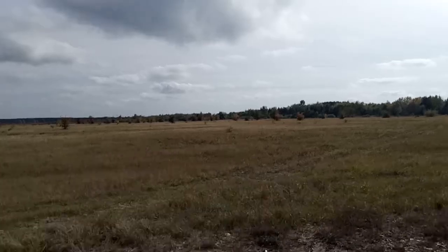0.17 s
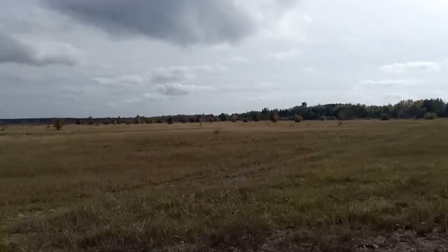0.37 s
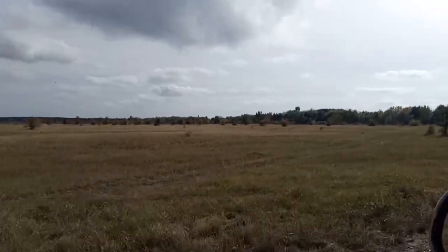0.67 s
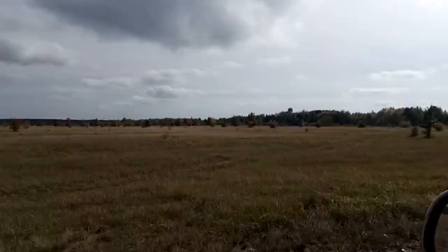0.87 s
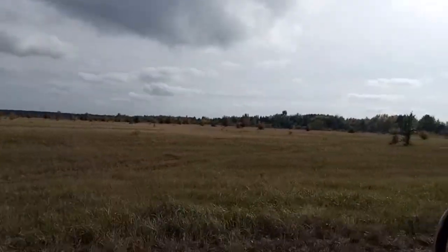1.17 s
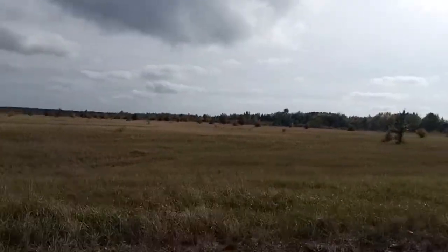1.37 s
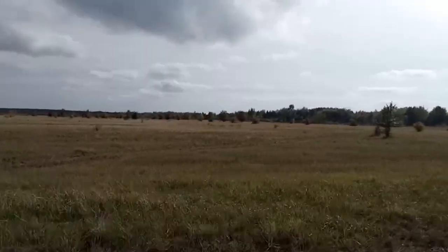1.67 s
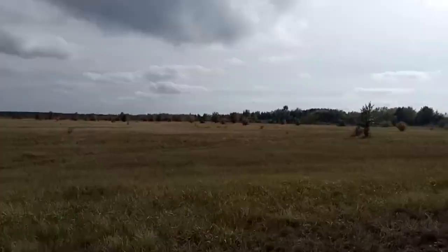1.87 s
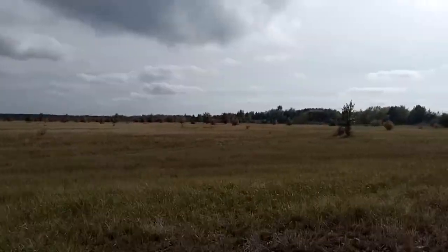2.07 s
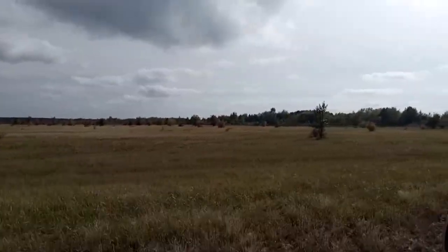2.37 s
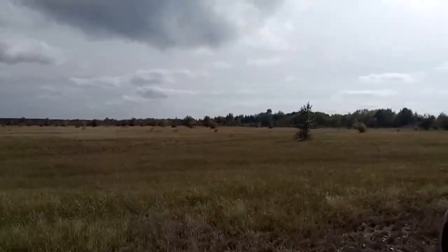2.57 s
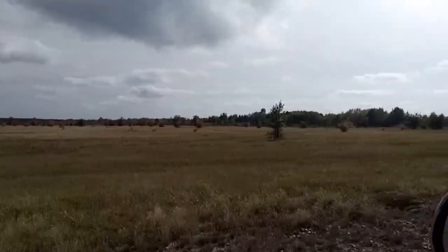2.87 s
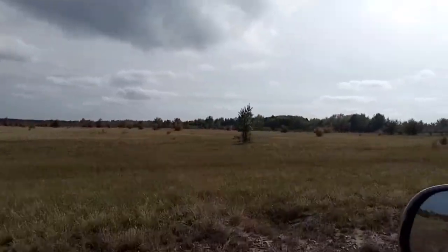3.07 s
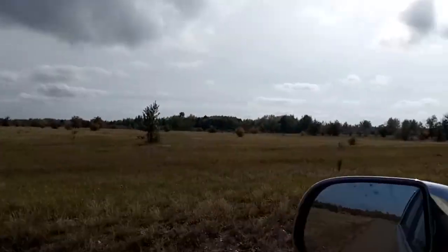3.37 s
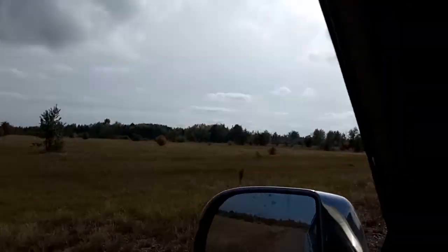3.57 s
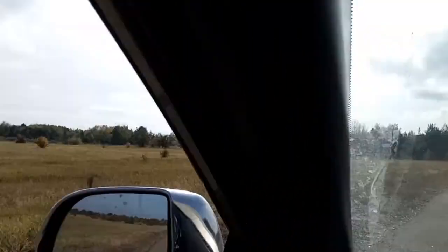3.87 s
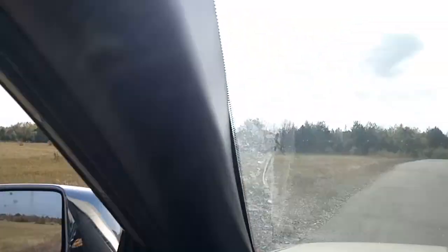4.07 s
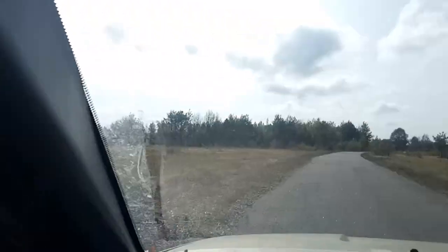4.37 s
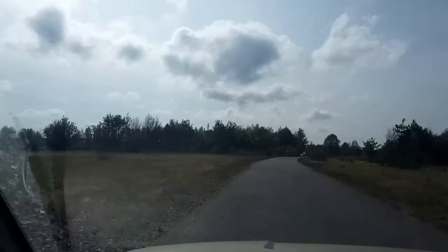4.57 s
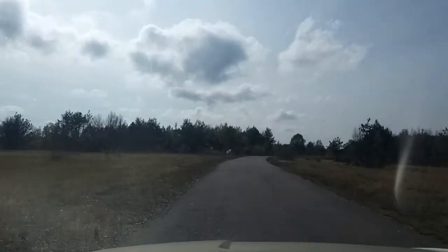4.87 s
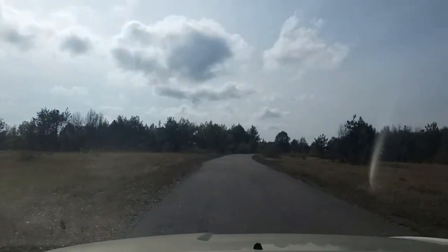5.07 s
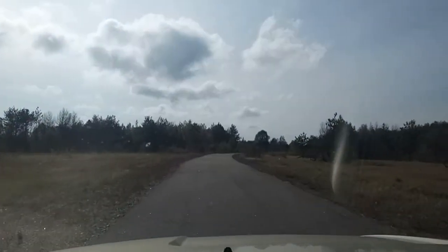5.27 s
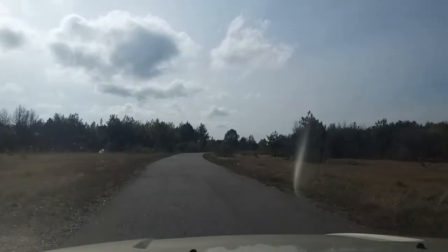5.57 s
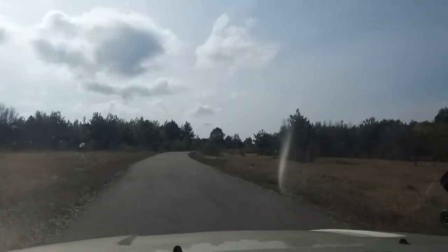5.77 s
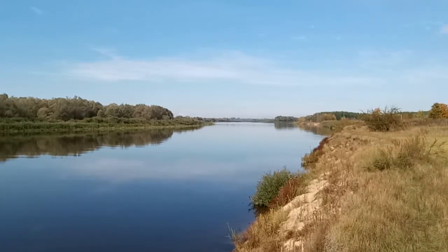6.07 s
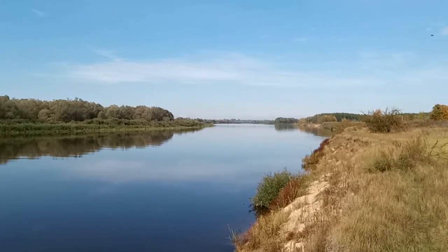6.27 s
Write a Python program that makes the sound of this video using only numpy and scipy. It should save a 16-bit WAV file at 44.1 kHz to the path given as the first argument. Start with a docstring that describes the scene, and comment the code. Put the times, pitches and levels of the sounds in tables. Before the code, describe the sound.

Heard from inside a car on a narrow road beside a field: fluttering low wind at the open window, tyre roar and a wavering engine hum. Hand and sleeve rub the microphone faintly, with a few dry ticks. As it turns toward the windscreen the roar softens and grows boomier. Near the end everything cuts abruptly to a quiet river bank, with only small low puffs of wind.

```python
"""A car rolls along a narrow road, heard from inside by an open window: wind rumble, tyre roar, engine hum.
Wind and tyres are shaped noise, the engine is a few wavering tones; grit and a brake add faint hiss.
As the camera turns from window to windscreen, hand and sleeve rub it (noise bursts) and it ticks (snaps).
Then comes an abrupt change to a quiet river bank: short low tones for puffs of wind on the microphone,
over soft noise for breeze, flutter and open air."""
import sys
import numpy as np
from scipy import signal
from scipy.fft import rfft, irfft
from scipy.io import wavfile
from scipy.ndimage import uniform_filter1d

SR = 44100
rng = np.random.default_rng(int(sys.argv[2]) if len(sys.argv) > 2 else 0)


def output_pcm(signal):
    """Save a mono or channel-first signal as 16-bit PCM at the path in sys.argv[1].

    Samples are clipped to [-1, 1] before scaling.
    """
    pcm = np.clip(np.atleast_2d(signal).T, -1, 1) * 32767
    wavfile.write(sys.argv[1], SR, np.round(pcm).astype(np.int16))


N = 283122
TIME, HZ = np.arange(N) / SR, np.fft.rfftfreq(N, 1 / SR)  # seconds, and the frequencies of the whole sound
DRIVE_START, DRIVE_END = .082, 5.8528  # seconds

# The camera's turn. Each row: time in seconds, share of the way from window (0) to windscreen (1).
CAMERA_TURN = [(0, 0), (3.2, 0.16), (3.75, 0.65), (4.6, 0.77), (5.8, 0.93)]
# Fade-in of the drive. Each row: time in seconds, level in dB.
DRIVE_FADE = [(.082, -25), (.128, -23.5), (.15, -11.5), (.18, -7), (.225, -6), (.28, -1), (.35, 0)]

# Tone of the wind buffeting, facing the window and then the windscreen.
# Each row: frequency in Hz, relative level in dB per Hz.
RUMBLE_WINDOW = [(8, -10), (32, -18), (45, 1.5), (54, -2), (64, -1.5), (80, -2), (105, 0.5), (132, 1.5),
                 (155, -4.5), (200, -5), (255, -6.5), (310, -15.5), (450, -21), (900, -73)]
RUMBLE_SCREEN = [(8, -12), (32, -9), (45, -8), (64, 4.5), (78, -2), (105, 0), (130, 3.5), (155, -7.5),
                 (225, -8), (275, -14.5), (450, -25), (900, -70)]
# Brief rises and dips in level, shared by the wind rumble and the engine hum.
# Each row: middle in seconds, change in dB, half length in seconds.
RISES_AND_DIPS = [(.2, -0.5, 0.026), (0.49, -3.5, .025), (.668, 2, .04), (0.854, -3, .014),
                  (1.268, 1.5, 0.0088), (1.857, -5.5, .035), (2.293, 5, 0.0096), (2.612, 4, 0.029),
                  (2.755, -5, .012), (3.044, 1, .01), (3.425, 3, .018), (3.686, 2.6, .028),
                  (3.888, 2.5, 0.015), (4.282, -3, 0.013), (4.54, 3.5, 0.023), (5.127, 3.5, 0.013),
                  (5.235, -1, 0.011), (5.61, 4.5, 0.029), (5.717, 5.5, .014)]

# Tone of the tyre roar, facing the window and then the windscreen.
# Each row: frequency in Hz, relative level in dB per Hz.
ROAR_WINDOW = [(150, -4.5), (190, -2.5), (255, 4.5), (310, -4.5), (380, -0.5), (470, -6), (700, -6.5),
               (950, -8.5), (1200, -8), (1650, -9), (2120, -16.5), (3050, -32.5), (6300, -41.5),
               (8100, -54), (12000, -59), (14500, -64)]
ROAR_SCREEN = [(200, -2.5), (350, 3.5), (560, 2.5), (760, -4), (1300, -3.5), (1700, -10), (2150, -15.5),
               (2600, -28), (3300, -33), (6500, -40.5), (8200, -40), (11000, -41), (13000, -54),
               (15000, -60)]
# Cabin resonances, facing the window and then the windscreen. Each row: centre in Hz, width in Hz, lift in dB.
CABIN_WINDOW = [(357, 14, 4.5), (630, 274, 8.5), (780, 67, 2), (1143, 180, 6), (1560, 210, 4.5),
                (2020, 510, 5), (2640, 320, 5)]
CABIN_SCREEN = [(352, 39, 8.1), (545, 63, 3.8), (595, 350, 1.3), (915, 320, 3.3), (1277, 40, 2.9),
                (1410, 80, 2.5), (2300, 90, 2.4)]
# Strength of the tyre roar. Each row: time in seconds, base level in dB.
ROAR_LEVEL = [(.35, -43), (2, -42.5), (3.15, -41.5), (3.8, -44), (4.25, -46), (5.2, -46), (5.7, -45.5)]
# Three hollow resonances of the window opening that slide as the microphone turns.
# Each row: time in seconds, centre in Hz, half width in Hz, lift in dB.
HOLLOW_LOW = [(.3, 805, 42, 3.5), (3.3, 800, 48, 5), (3.6, 840, 90, 3.5), (3.85, 900, 85, 7.5),
              (4.1, 945, 85, 6), (4.5, 900, 85, 2.5), (5.7, 960, 80, 5)]
HOLLOW_MIDDLE = [(.3, 1243, 70, 3.2), (3.0, 1245, 55, 2.6), (3.2, 1255, 75, 8.4), (3.42, 1276, 70, 10.6),
                 (3.55, 1300, 70, 1), (4.1, 1280, 50, 0.93), (4.6, 1305, 35, 6.9), (5.7, 1324, 50, 3.7)]
HOLLOW_HIGH = [(.3, 1740, 55, 4), (1.7, 1700, 69, 0), (2.5, 1697, 55, 4.5), (3.2, 1680, 60, 4),
               (3.8, 1610, 80, 1), (4.2, 1600, 90, 3), (4.6, 1740, 90, 7), (5.2, 1750, 90, -1)]

# The engine. Each row: time in seconds, firing rate in Hz, base hum level in dB.
ENGINE_RUN = [(.4, 44.95, -46), (1.5, 44.82, -37.5), (3.7, 46.84, -38), (4.6, 45.88, -38.5),
              (5.8, 46.48, -38.5)]
# Tones of the hum. Each row: multiple of the firing rate, dB facing the window, dB facing the windscreen.
ENGINE_TONES = [(1, -9.5, -12.5), (2, -2.5, 0.5), (4, -14, -8)]

# Tyres swishing over loose grit. Each row: crest in seconds, rms level in dB, half length in seconds.
GRIT_SWISHES = [(.43, -65, 0.041), (1.0, -60, 0.11), (1.69, -67.5, 0.044), (1.89, -69, 0.024),
                (2.81, -72, 0.017), (3.23, -66, 0.021), (3.6, -66.5, 0.087), (3.955, -59, 0.0093),
                (4.41, -62.5, 0.06), (5.06, -69, 0.026), (5.805, -64, 0.0083)]
# Tone of the grit. Each row: frequency in Hz, relative level in dB per Hz.
GRIT_TONE = [(1500, -19), (3000, -17.5), (4200, 2), (5200, -6.5), (6300, -4), (7500, -14.5), (10000, -10.5),
             (15000, -22)]

# Strokes of hand and sleeve on the camera. Each row: time of full speed in seconds, hold in seconds,
# base level in dB, build-up in dB per second, release in dB per second.
RUB_STROKES = [(0.621, 0.13, -53.5, 170, 79), (0.926, 0.19, -62.5, 37, 35), (3.873, 0.079, -56.5, 24, 36),
               (3.945, .015, -59, 150, 160), (4.375, 0.28, -54.5, 44, 32), (5.177, 0.076, -59, 80, 42)]
# Tone of the hand shifting its grip, then of the sleeve. Each row: frequency in Hz, relative level in dB per Hz.
GRIP_TONE = [(1500, -34), (3100, -12.5), (4100, -1.5), (4700, -0.5), (6200, -1), (7200, -6.5),
             (8100, -14.5), (9500, -8), (12500, -9.5), (13800, -6), (16000, -23)]
SLEEVE_TONE = [(1500, 4.5), (3100, -3.5), (4500, -16.5), (5500, -6.5), (6500, 1), (7400, -5), (8300, -11),
               (9600, -2), (10900, 3.5), (12500, -2), (13800, -9), (16000, -1)]
# Ring of the microphone port. Each row: centre in Hz, width in Hz, lift in dB.
PORT_RING = [(14760, 800, 12.5)]
# Ticks of the camera body. Each row: start in seconds, peak in dB, time to die by 60 dB in seconds,
# upper edge of the band in Hz, rattle strength beside the sharp edge (0-1).
CAMERA_TICKS = [(.5077, -50, .012, 9000, .4), (.513, -50, .07, 14000, .4), (.5255, -44.5, .03, 12000, .5),
                (2.6312, -45.5, .05, 5500, .8), (5.4233, -32.5, .0008, 11000, .2),
                (5.4335, -48, .045, 4500, .7), (5.4485, -47, .035, 5000, .7),
                (5.7773, -47, .009, 15000, .6)]

# Puffs of wind on the bank. Each row: crest in seconds, peak in dB, pitch in Hz, half length in seconds.
PUFF_ROWS = [(5.901, -54, 90, .008), (5.923, -49.5, 115, 0.0064), (5.96, -40, 75, 0.0057),
             (6.025, -47, 100, 0.0056), (6.048, -49, 180, 0.0066), (6.074, -35, 90, 0.0053),
             (6.097, -48, 80, .007), (6.134, -32.5, 105, 0.0051), (6.177, -42, 65, 0.015),
             (6.242, -33.5, 75.6, 0.0045), (6.26, -46, 85, .006), (6.322, -51, 55, 0.015),
             (6.392, -50, 55, 0.01), (6.413, -30, 109, 0.0078)]
# Lighter flutters of wind. Each row: crest in seconds, rms level in dB, half length in seconds.
FLUTTER_ROWS = [(5.968, -67, .01), (6.011, -66, .005), (6.029, -66, .004), (6.048, -65, .006),
                (6.063, -63.5, .005), (6.07, -67, .05), (6.13, -65, .007)]
# Tone of the breeze, of the flutter and of the open air. Each row: frequency in Hz, relative level in dB per Hz.
BREEZE_TONE = [(8, -22), (20, -9), (50, -1), (85, 1), (125, -5), (170, -14), (300, -32), (600, -43),
               (1200, -58), (3000, -81), (12000, -106)]
FLUTTER_TONE = [(100, -4), (250, -2), (400, -4.5), (700, -13), (1200, -29), (3000, -51)]
AIR_TONE = [(180, -23.5), (300, 4), (726, -9), (823, -9.5), (1750, -14.5), (4590, -16.5), (6200, -18),
            (8100, -26), (13000, -27)]
# Strength of the open air. Each row: time in seconds, level in dB.
AIR_LEVEL = [(5.85, -86), (5.93, -82), (6.02, -78), (6.15, -74.5), (6.42, -70.5)]


def wind(buffet_db=2.0, window_db=-33.5, screen_db=-31.5):
    """Eddies at the open window shake the cabin air in quick lumps, with more boom further inside."""
    eddies = noise() * gain_of(buffet_db * drift(rate_hz=110))
    window = gain_of(window_db) * steadied(coloured(eddies, RUMBLE_WINDOW), seconds=0.2)
    screen = gain_of(screen_db) * steadied(coloured(eddies, RUMBLE_SCREEN), seconds=0.14)
    return turned(window, screen)


def rises_and_dips():
    """Brief rises and dips in level, shared by the wind rumble and the engine hum."""
    change_db = sum(db * np.exp(-((TIME - s) / half) ** 2) for s, db, half in RISES_AND_DIPS)
    return gain_of(change_db)


def tyres(window_db=1.5, screen_db=1.0, flutter_db=0.5):
    """Road roar through the cabin, quieter and differently coloured once the microphone faces the windscreen."""
    road = patchy(depth_db=0.6) * gain_of(flutter_db * drift(rate_hz=44))
    window = gain_of(window_db) * coloured(road, ROAR_WINDOW, CABIN_WINDOW)
    screen = gain_of(screen_db) * coloured(road, ROAR_SCREEN, CABIN_SCREEN)
    roar = gain_of(curves(ROAR_LEVEL)[0]) * turned(window, screen)
    for hollow in (HOLLOW_LOW, HOLLOW_MIDDLE, HOLLOW_HIGH):
        roar = hollowed(roar, hollow)
    return roar


def hollowed(x, rows):
    """A sliding resonance of the window opening: a hump with a shallow dip on either side."""
    hz, t, z = signal.stft(x, SR, nperseg=2048, noverlap=1536)
    s, *columns = np.transpose(rows)
    centre, half, lift = [np.interp(t, s, c) for c in columns]
    away = ((hz[:, None] - centre) / half) ** 2
    hump_db = lift * (1 - away) * np.exp(-away / 2)
    return signal.istft(z * gain_of(hump_db), nperseg=2048, noverlap=1536)[1][:N]


def engine(wobble=0.0097, waver_db=2.5):
    """Harmonics of the firing rate waver at random in level; the highest booms more inside the cabin."""
    hz, level_db = curves(ENGINE_RUN)
    unsteady_hz = hz * (1 + wobble * drift(rate_hz=6.32))
    angle = 2 * np.pi * np.cumsum(unsteady_hz) / SR
    hum = np.zeros(N)
    for multiple, window_db, screen_db in ENGINE_TONES:
        db = level_db + turned(window_db, screen_db) + waver_db * drift(rate_hz=16.0)
        hum += gain_of(db) * np.sin(round(multiple) * angle + 2 * np.pi * rng.random())
    return np.sqrt(2) * hum  # a sine's peak is root two times its rms


def grit(scatter_db=-78, uneven_db=4):
    """Brief gritty swishes from the road, over a faint uneven scatter."""
    scatter = gain_of(scatter_db + uneven_db * drift(rate_hz=20.0))
    return np.hypot(scatter, swells(GRIT_SWISHES)) * coloured(noise(), GRIT_TONE)


def brake(level_db=-78, centre_hz=11150, skirt_db=-76, wheel_turn_s=.249, crest_s=2.08):
    """A faint, high, broken hiss that returns with each wheel turn, as of a pad brushing its disc."""
    phase = ((TIME - crest_s) / wheel_turn_s + .5) % 1 - .5  # in wheel turns, 0 at the crest
    band = fuzzy_tone(centre_hz + 700 * phase, width_hz=520)
    band *= gain_of(level_db + 3 * drift(rate_hz=45))
    skirt = fuzzy_tone(np.full(N, centre_hz), width_hz=2600)
    skirt *= gain_of(skirt_db + 2.5 * drift(rate_hz=14))
    throb_db = 2.2 * (np.cos(2 * np.pi * phase) - 1)
    return gain_of(throb_db) * (band + skirt)


def rubbing(grip_db=4.5, sleeve_db=2.0, grain_db=1.0, onset_db=-76):
    """Tiny slips ring the microphone port: the grip hisses evenly, the sleeve's hiss flickers in streaks."""
    slips = noise() * gain_of(grain_db * drift(rate_hz=97))
    grip = gain_of(grip_db) * coloured(slips, GRIP_TONE, PORT_RING)
    echoed = reflected(slips, strength=0.25, sway_s=.00008)
    sleeve = gain_of(sleeve_db) * coloured(echoed, SLEEVE_TONE, PORT_RING)
    speed = stroke_speed()
    sliding = speed ** 2 / (speed ** 2 + gain_of(onset_db) ** 2)  # near 0 at rest, near 1 in a stroke
    return speed * sliding * turned(grip, flickering(sleeve, depth_db=8.5))


def stroke_speed():
    """Sliding speed as an amplitude: each stroke builds up, holds and dies away."""
    power = np.zeros(N)
    for s, hold, db, build_up, release in RUB_STROKES:
        before, after = np.maximum(s - TIME, 0), np.maximum(TIME - s - hold, 0)
        power += gain_of(db - build_up * before - release * after) ** 2
    return np.sqrt(power)


def reflected(x, strength, sway_s, count=6):
    """Glass and trim echo within milliseconds; the swaying hand shifts the comb that they make."""
    out = x.copy()
    fine = signal.resample_poly(x, 4, 1)  # four times finer steps, so the echoes slide smoothly
    for delay in np.geomspace(.0017, .009, count):
        late = np.rint(4 * SR * (delay + sway_s * drift(rate_hz=1.2))).astype(int)
        out += strength * fine[4 * np.arange(N) - late]
    return evened(out)


def ticks(low_hz=1400):
    """Dry snaps of the camera body with little bass: one sharp edge, then a small dying rattle."""
    out = np.zeros(N)
    for s, db, t60, high_hz, rattle in CAMERA_TICKS:
        age = np.maximum(TIME - s, 0)
        decay = gain_of(-60 * np.minimum(age / t60, 2))
        snap = rattle * noise() * (TIME >= s) * decay
        snap[np.searchsorted(TIME, s)] = 1  # the sharp edge
        snap = signal.lfilter(*signal.butter(1, [low_hz, high_hz], "band", fs=SR), snap)
        out += gain_of(db) * snap / abs(snap).max()
    return out


def river_bank(lull_db=-58.5, lump_db=4, flap_db=3, wake_db=-17, wake_s=.014, rise_s=.07):
    """Faint open air, separate puffs with a little turbulence around each, and a lighter flutter."""
    rise = np.clip((TIME - DRIVE_END) / rise_s, 0, 1) ** 2
    lull = gain_of(lull_db + lump_db * drift(rate_hz=33)) * rise
    wake = swells([(s, db + wake_db, wake_s) for s, db, _, _ in PUFF_ROWS])
    breeze = np.hypot(lull, wake) * steadied(coloured(noise(), BREEZE_TONE), seconds=0.048)
    flaps = noise() * gain_of(flap_db * drift(rate_hz=65))
    flutter = swells(FLUTTER_ROWS) * coloured(flaps, FLUTTER_TONE)
    air = gain_of(curves(AIR_LEVEL)[0]) * coloured(noise(), AIR_TONE)
    return puffs() + breeze + flutter + air


def puffs():
    """Each eddy gives the microphone a brief push and pull: a short swell of a low tone."""
    out = np.zeros(N)
    for s, db, hz, half in PUFF_ROWS:
        out += swells([(s, db, half)]) * np.sin(2 * np.pi * (hz * (TIME - s) + rng.random()))
    return out


def gain_of(db):
    """Decibels to amplitude."""
    return 10 ** (np.asarray(db) / 20)


def evened(x):
    """Scales to rms 1."""
    return x / np.sqrt(np.mean(x ** 2) + 1e-20)


def curves(rows):
    """Each column of a timed table, at every sample."""
    s, *columns = np.transpose(rows)
    return [np.interp(TIME, s, c) for c in columns]


def turned(window, screen):
    """Blends from what is heard facing the window to what is heard facing the windscreen."""
    turn = np.clip(curves(CAMERA_TURN)[0], 0, 1)
    return (1 - turn) * window + turn * screen


def noise():
    """White noise: equal strength at all frequencies."""
    return rng.standard_normal(N)


def drift(rate_hz):
    """Slow random wandering of rms 1, up to about the given rate."""
    return evened(irfft(rfft(noise()) * np.exp(-(HZ / rate_hz) ** 2), N))


def coloured(x, spectrum, resonances=()):
    """Filters x by a smooth spectrum with resonant humps on it; rms 1."""
    f, level = np.transpose(spectrum)
    db = np.interp(np.log(HZ + 1), np.log(f + 1), level)
    for hz, width, lift in resonances:
        db = db + lift / (1 + (2 * (HZ - hz) / width) ** 2)
    return evened(irfft(rfft(x) * gain_of(db), N))


def steadied(x, seconds):
    """Takes the slow swells out of a noise and keeps its fast flutter."""
    power = irfft(rfft(x ** 2) * np.exp(-(HZ * seconds) ** 2), N)
    return x / np.sqrt(np.maximum(power, 1e-6))


def smooth_grid(shape, bins, frames):
    """Random values over frequency and time, smoothed along both; rms 1."""
    smooth = uniform_filter1d(rng.standard_normal(shape), bins, axis=0)
    return evened(uniform_filter1d(smooth, frames, axis=1))


def patchy(depth_db, size=9):
    """White noise whose level wanders in small patches of time and frequency."""
    z = signal.stft(noise(), nperseg=512)[2]
    patches = smooth_grid(z.shape, size, size)
    return signal.istft(z * gain_of(depth_db * patches), nperseg=512)[1][:N]


def flickering(x, depth_db, limit=2.2):
    """The hiss above the roar flickers in thin, brief streaks, none far above the rest."""
    hz, _, z = signal.stft(x, SR, nperseg=1024, noverlap=768)
    streaks = np.minimum(smooth_grid(z.shape, bins=3, frames=12), limit)
    # share of the flicker that each frequency gets
    reach = np.interp(hz, [1790, 3200, 6800, 9000, 13000], [0.022, 0.79, 0.68, 0.4, 0.097])
    flicker = gain_of(depth_db * reach[:, None] * streaks)
    return signal.istft(z * flicker, nperseg=1024, noverlap=768)[1][:N]


def swells(rows):
    """Amplitude curve of smooth swells, each given by its crest (s), level (dB) and half length (s)."""
    return np.sqrt(sum(gain_of(db) ** 2 * np.exp(-((TIME - s) / half) ** 2) for s, db, half in rows))


def fuzzy_tone(hz, width_hz):
    """A narrow band of noise whose centre follows a curve; about rms 1."""
    angle = 2 * np.pi * np.cumsum(hz) / SR
    return drift(width_hz) * np.cos(angle) + drift(width_hz) * np.sin(angle)


def scene():
    """The drive, then all at once the river bank."""
    car = rises_and_dips() * (wind() + engine())
    car += flickering(tyres() + brake(), depth_db=7.0)
    car += flickering(grit(), depth_db=7.0)
    car += rubbing() + ticks()
    # very short ramps at the joins
    in_car = np.interp(TIME, [DRIVE_START, DRIVE_START + .004, DRIVE_END - .00006, DRIVE_END], [0, 1, 1, 0])
    on_bank = np.interp(TIME, [DRIVE_END, DRIVE_END + .002, TIME[-1] - .002, TIME[-1]], [0, 1, 1, 0])
    return (in_car * gain_of(curves(DRIVE_FADE)[0]) * car + on_bank * river_bank())[None]


def record(dry, edge_hz=15120):
    """The recorder's band limit: a steep filter removes what lies above the edge."""
    low_pass = signal.firwin(511, edge_hz, window=("kaiser", 9), fs=SR)
    return signal.oaconvolve(dry, low_pass[None], "same")


dry = scene()
out = record(dry)
output_pcm(out)
```